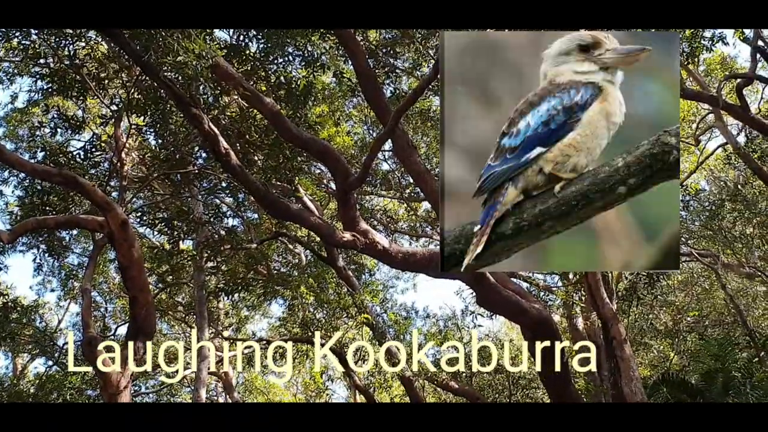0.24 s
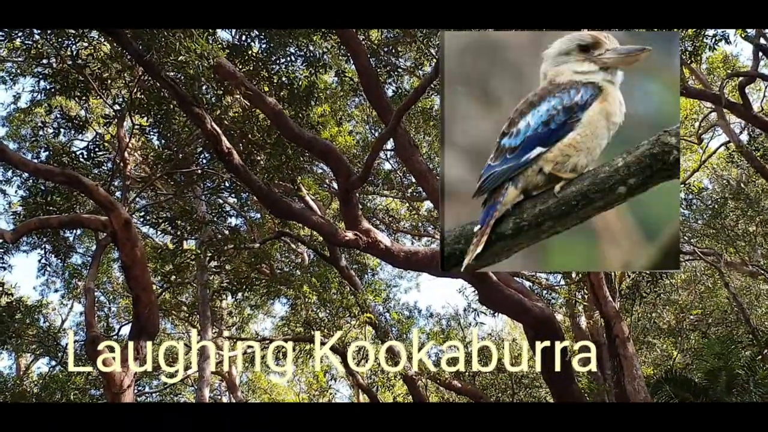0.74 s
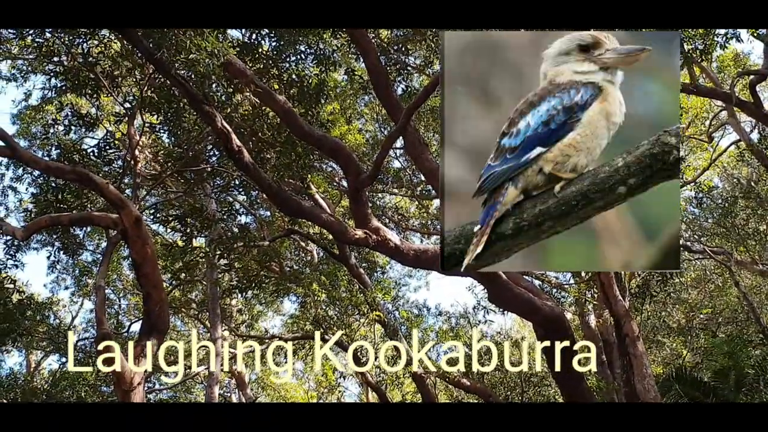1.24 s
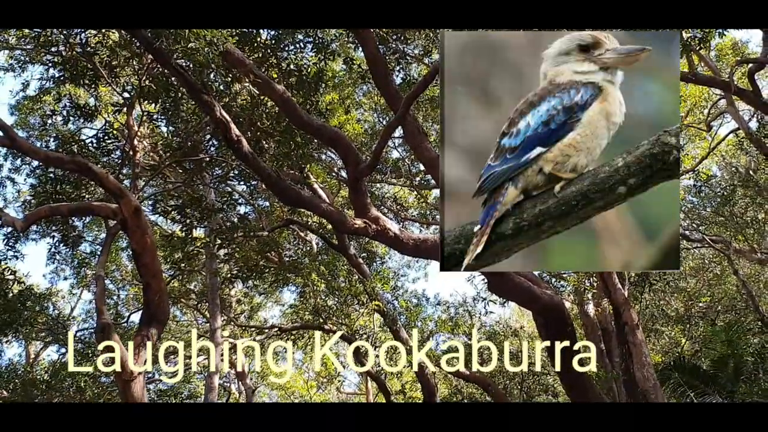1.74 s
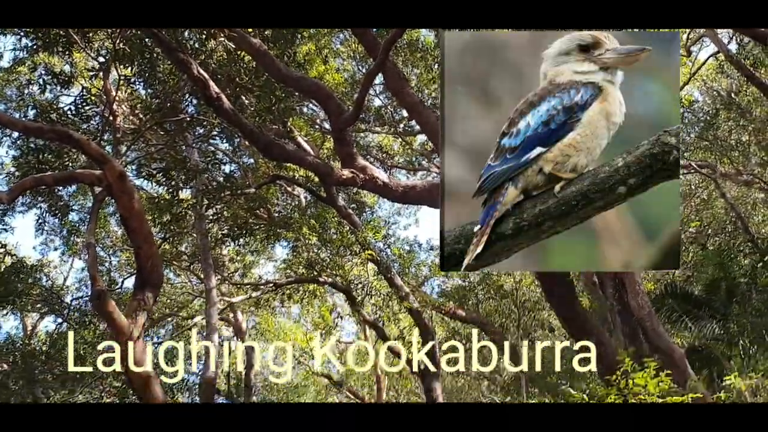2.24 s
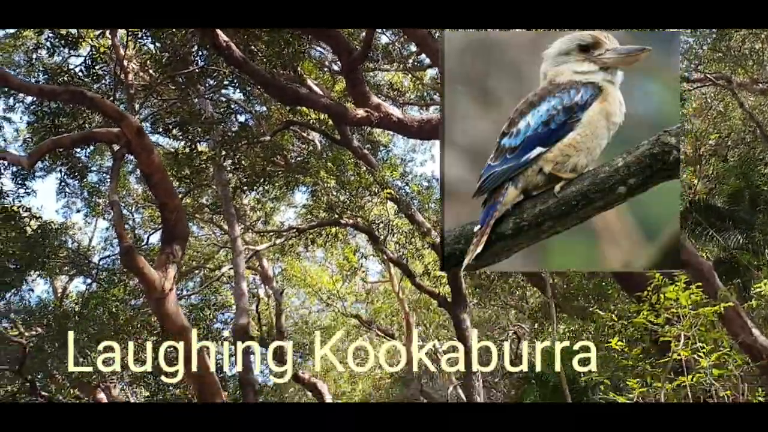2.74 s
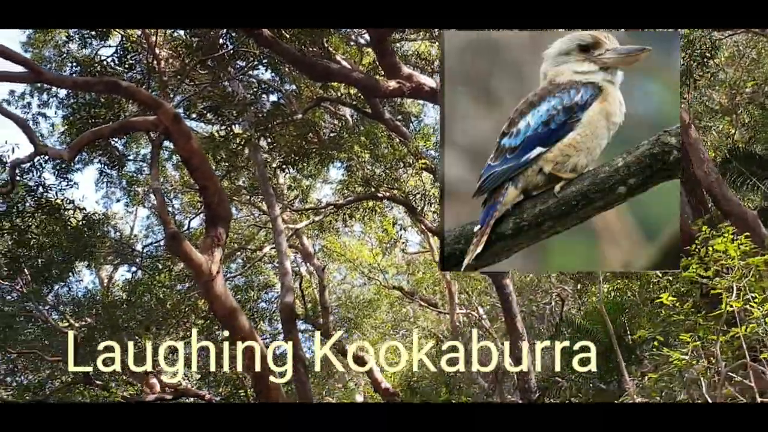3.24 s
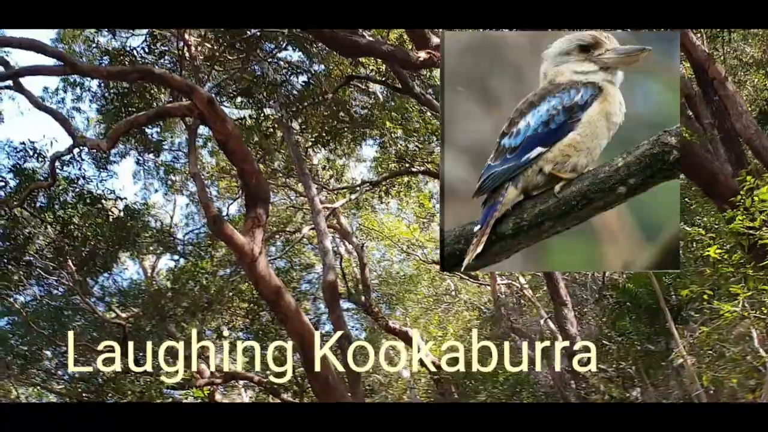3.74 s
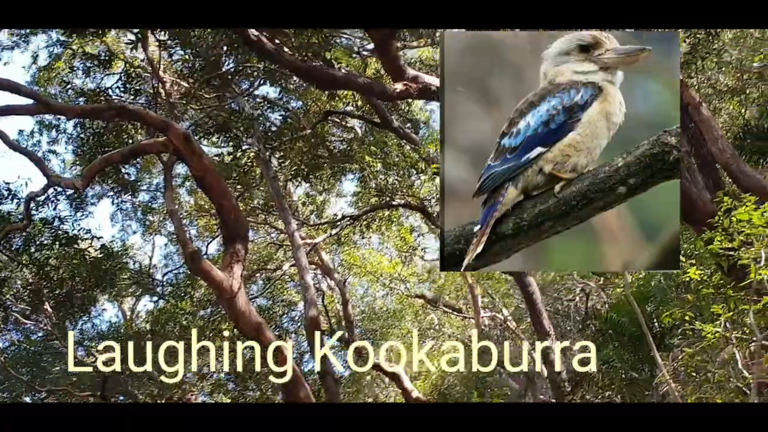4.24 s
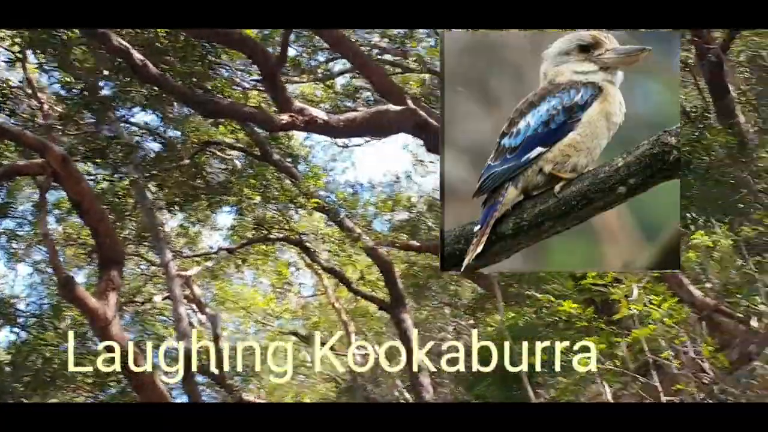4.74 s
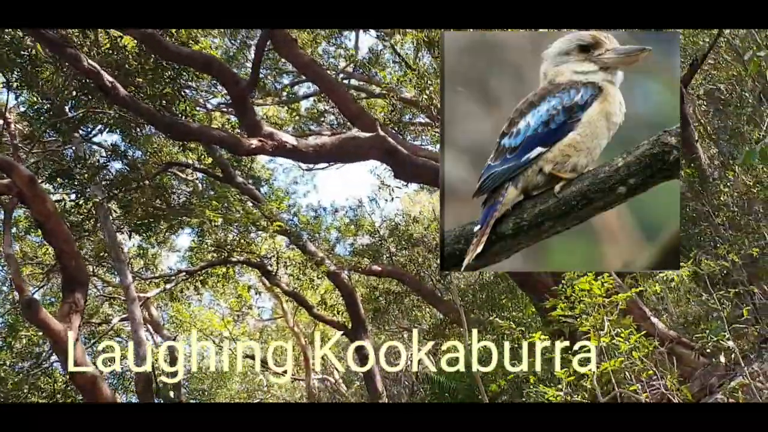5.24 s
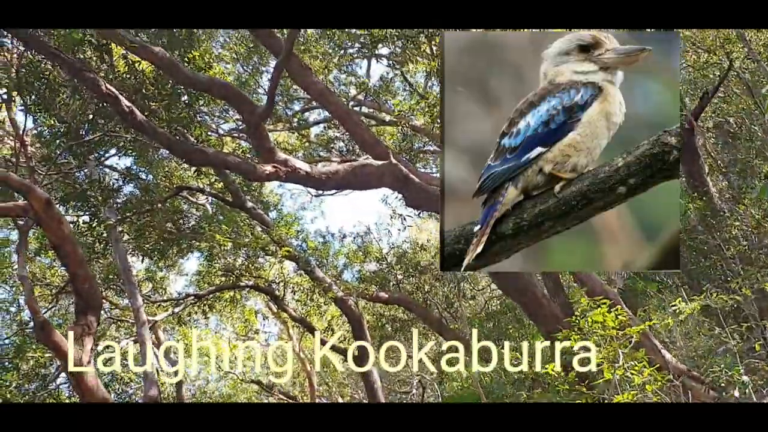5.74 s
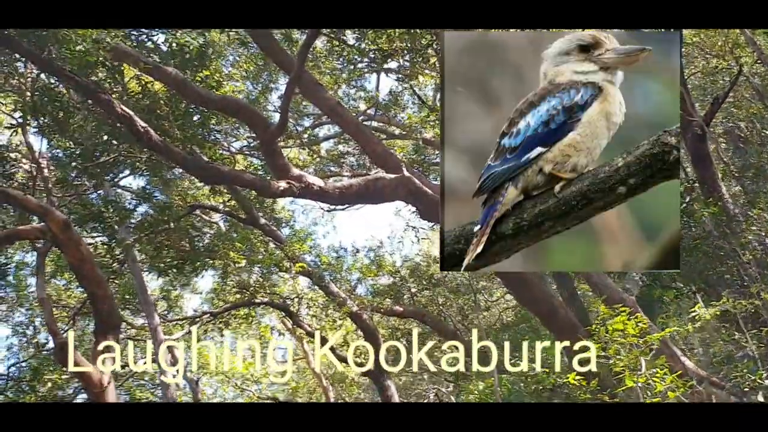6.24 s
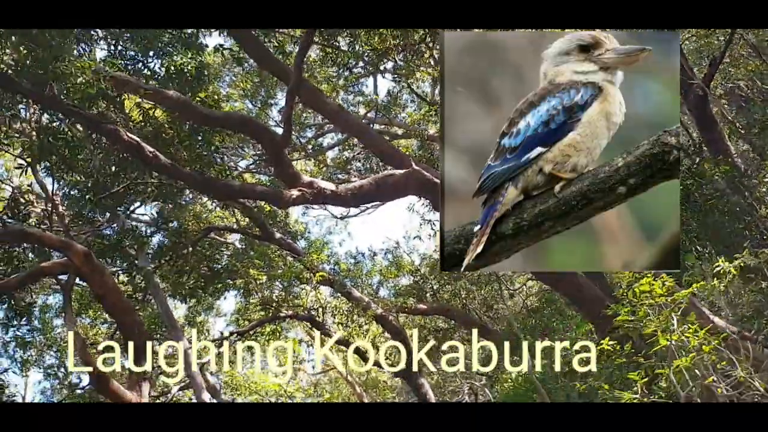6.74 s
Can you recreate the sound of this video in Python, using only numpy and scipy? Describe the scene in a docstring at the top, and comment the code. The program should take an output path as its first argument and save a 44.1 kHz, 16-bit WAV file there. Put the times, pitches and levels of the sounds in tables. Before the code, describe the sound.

A handheld stereo camera picks up two kookaburras in reverberant bush, both to the right. Bright hoots around a whistling mid-high pitch alternate with rough, rolling chuckles; gritty squawks interrupt. Close handling thuds and rubs sit left during the first second or so, ending in a hard click that briefly lowers the level. The hooting thins after four seconds, then two long breaking notes sound before echoes fade.

```python
"""A stand of gum trees, with two kookaburras off to the right of a hand-held camera with two microphone ports.
One bird laughs: pulsed hoots and two long breaking notes from a harmonic voice, joined by a flapping chuckle.
The other throws in harsh rasps, made of snaps and noise ringing a throat. Decaying noise makes the trees echo.
Right at the microphone, fingers bump, rub and grip the case. One sharp tap ducks the gain control,
which recovers slowly. Faint air moves in the leaves behind."""
import sys
import numpy as np
from scipy import signal
from scipy.fft import rfft, irfft, next_fast_len
from scipy.io import wavfile
from scipy.ndimage import map_coordinates

SR = 44100
rng = np.random.default_rng(int(sys.argv[2]) if len(sys.argv) > 2 else 0)


def transcribe(signal):
    """Save signal, clipped to [-1, 1], as a 16-bit WAV file at the path in sys.argv[1]."""
    frames = np.atleast_2d(signal).T
    limited = np.clip(frames, -1, 1)
    pcm = np.round(limited * 32767).astype(np.int16)
    wavfile.write(sys.argv[1], SR, pcm)


N = 308700
TIME = np.arange(N) / SR


def amp(db):
    """Decibels to gain."""
    return 10 ** (np.asarray(db) / 20)


def unit(x):
    """Scale to rms 1."""
    return x / np.sqrt(np.mean(x ** 2) + 1e-20)


def along(points, hz):
    """Read (Hz, value) points on a log frequency axis."""
    f, v = np.transpose(points)
    return np.interp(np.log(hz + 1), np.log(f), v)


def filtered(x, response):
    """x times a response of frequency."""
    n = x.shape[-1]
    padded = next_fast_len(n + 4096)
    hz = np.fft.rfftfreq(padded, 1 / SR)
    return irfft(rfft(x, padded) * response(hz), padded)[..., :n]


def coloured(x, points, stretch=1):
    """x through a spectrum, at rms 1; stretch moves the spectrum up in frequency."""
    return unit(filtered(x, lambda hz: amp(along(points, hz / stretch))))


def wobble(rate, n):
    """A smooth random curve with rate knots a second."""
    knots = rng.standard_normal(n // 8 + 8)
    used = knots[:int(n * rate / SR) + 4]
    return map_coordinates(used, [np.arange(n) * rate / SR], mode="nearest")


def add(track, start_s, x):
    """Mix x into the track at start_s, or at the top if that is negative."""
    i = max(round(start_s * SR), 0)
    track[..., i:i + x.shape[-1]] += x[..., :track.shape[-1] - i]


def swell(t, length, rise, fall):
    """A smooth opening and closing, times in seconds."""
    opening = np.sin(np.pi / 2 * np.clip(t / rise, 0, 1))
    closing = np.sin(np.pi / 2 * np.clip((length - t) / fall, 0, 1))
    return opening * closing


# spectrum of distant air and leaves: freq_hz, level_db (relative)
BUSH = [(25, -3.5), (70, -0.5), (150, -9), (400, -8.5), (800, -8.5), (1600, 3.5), (3000, -17.5),
        (5000, -26.5), (9000, -32.5), (15000, -25.5)]


def bush():
    """Faint moving air in the leaves: coloured noise, partly shared by both ports, slowly wavering."""
    air = rng.standard_normal((2, N)) + 0.94 * rng.standard_normal(N)
    return amp(-45 + 0.37 * wobble(2.607, N)) * coloured(air, BUSH)


# the hand shifts its grip on the case: start_s, length_s, level_db (relative)
SHIFTS = [(0.014, 0.15, -45), (0.237, 0.12, -36), (0.43, 0.1, -57), (0.553, 0.14, -60), (0.823, 0.072, -53),
          (1.024, 0.2, -45), (1.988, 0.032, -42), (2.396, 0.038, -48), (2.525, 0.12, -47),
          (3.506, 0.03, -49), (3.638, 0.19, -54), (4.069, 0.06, -51), (4.256, 0.045, -49),
          (4.374, 0.28, -51.5), (4.744, 0.036, -46), (5.63, 0.09, -51), (5.797, 0.096, -46.5),
          (6.054, 0.11, -47.5), (6.759, 0.25, -52.5)]
SHIFT_DB, SHIFT_FADE_DB_PER_S = 7.5, 51
SHIFT_ATTACK_S, SHIFT_RELEASE_S = .03, 0.055
TREMOR_DB = -70  # the resting hand, about which it wavers


def grip():
    """How hard the case is shaken: a faint tremor, and a short fading swell at each shift of the hand."""
    force = amp(TREMOR_DB + 3 * wobble(7.7, N))
    for start_s, length_s, level_db in SHIFTS:
        span = length_s + SHIFT_ATTACK_S
        t = np.arange(int(span * SR)) / SR
        fading = amp(level_db + SHIFT_DB - SHIFT_FADE_DB_PER_S * t)
        shift = fading * swell(t, span, SHIFT_ATTACK_S, SHIFT_RELEASE_S)
        add(force, start_s - SHIFT_ATTACK_S / 2, shift)
    return force


# fingers bump the camera: start_s, thud_db, click_db (relative)
BUMPS = [(.068, -20, -16.5), (.235, -19, -27), (.245, -33, -13), (0.258, -10.5, -12.5), (0.588, -24, -28),
         (0.641, -29, -25), (1.113, -12.5, 8), (1.132, -12, 1.5)]
# fingers slide on the case: start_s, length_s, hiss_db, rumble_db (relative)
RUBS = [(0.228, .1, -29, -33), (0.549, .16, -35, -43.5)]
# spectrum of handling rumble: freq_hz, level_db (relative)
CASE = [(20, -34.5), (40, -2), (62, 4), (95, -11), (160, -18.5), (300, -29.5), (800, -44.5), (2000, -71.5)]
# spectrum of rubbing hiss: freq_hz, level_db (relative)
SKIN = [(100, 2.5), (500, 3), (3000, 8), (7000, -8.5), (11000, -13.5), (15000, -18.5)]


def handling():
    """Bumps ring as short decaying sines, rubs and grip as coloured noise, all mostly at the left port."""
    thuds, clicks, slides = np.zeros(N), np.zeros(N), np.zeros((2, N))
    t = np.arange(SR // 8) / SR
    for start_s, thud_db, click_db in BUMPS:
        thud = np.sin(2 * np.pi * 68 * t) + 0.43 * np.sin(2 * np.pi * 150 * t)
        add(thuds, start_s, amp(thud_db - 60 * t / 0.035) * thud)
        modes = [(600, 0.13), (2100, 0.81), (4200, 0.97), (10200, 0.25)]  # Hz, gain
        ring = sum(gain * np.sin(2 * np.pi * hz * t) for hz, gain in modes)
        add(clicks, start_s, amp(click_db - 60 * t / 0.0015) * ring)
    for start_s, length_s, hiss_db, rumble_db in RUBS:
        t = np.arange(int(length_s * SR)) / SR
        stroke = swell(t, length_s, 0.017, 0.062) * amp(4.2 * wobble(200, len(t)))
        hiss = coloured(rng.standard_normal((2, len(t))), SKIN)
        add(slides, start_s, amp(hiss_db) * stroke * hiss)
        rumble = coloured(rng.standard_normal(len(t)), CASE)
        add(thuds, start_s, amp(rumble_db) * stroke * rumble)
    # the case rocks between the ports, and each port also feels its own share of the grip
    rocking = np.array([[1.2], [-.4]])
    shake = rocking * rng.standard_normal(N) + 0.58 * rng.standard_normal((2, N))
    held = rocking * thuds + grip() * coloured(shake, CASE)
    return held + clicks * np.array([[1], [.4]]) + slides * np.array([[1], [.8]])


# upper resonances of the laughing throat: freq_hz, level_db (relative)
THROAT = [(600, -60), (1350, -24), (1650, -6), (2150, -12), (2600, 0), (3100, -3), (3650, 0), (4000, -17),
          (4250, -17), (4650, -1), (5050, 2), (5800, -14), (6800, -30), (8000, -22), (8800, -27),
          (9700, -21), (10800, -35), (15000, -46)]


def syrinx(pitch, rough, air, stretch=1):
    """The fundamental, its octave and the edge (overtones plus rush in the throat), each at rms 1."""
    n = len(pitch)
    jitter = .04 * wobble(420, n) + .012 * wobble(1500, n)
    phase = 2 * np.pi * np.cumsum(pitch * (1 + rough * jitter)) / SR
    # a smooth note favours the third harmonic, a rough one the fourth
    third = np.clip(3.8 - 10 * rough, .3, 1.6)
    lower = third * np.sin(3 * phase) + np.sin(4 * phase)
    upper = .04 * np.sin(6 * phase) + .06 * np.sin(7 * phase)
    overtones = unit(lower + upper)
    breath = rng.standard_normal(n) * (1 + 0.36 * np.sin(phase))
    rush = coloured(breath, THROAT, stretch)
    return unit(np.sin(phase)), unit(np.sin(2 * phase)), unit(overtones + air * rush)


# chuckling rolls: start_s, length_s, pitch_hz (at the start), level_db, edge_db (relative)
ROLLS = [(-.1, 0.16, 1118, -31, -6.5), (.407, 0.385, 1249, -23, -15), (1.139, 0.39, 1164, -28, -11.5),
         (1.804, 0.35, 1187, -26, -14.5), (2.173, 0.21, 1255, -30.5, -13.5),
         (2.504, .41, 1197, -26.5, -13.5), (3.13, 0.22, 1189, -26, -15), (3.31, .29, 1192, -24, -15.5),
         (3.945, .325, 1209, -24, -15.5), (4.712, .295, 1169, -24.5, -15.5)]
ROLL_ATTACK_S, ROLL_RELEASE_S = .025, .035
ROLL_SAG_HZ_PER_S = 280  # a roll sinks as the air runs out
FLAP_HZ, FLAP_SAG = 81.75, .31  # typical flap rate; share by which the pitch sags as a flap closes


def chuckle():
    """A loose membrane flaps unevenly; each flap is a tiny chirp that rises to the pitch and sags as it closes."""
    out = np.zeros(N)
    for start_s, length_s, pitch_hz, level_db, edge_db in ROLLS:
        # a roll with a negative start is joined part-way
        t = np.arange(int(max(-start_s, 0) * SR), int(length_s * SR)) / SR
        flaps = np.cumsum(FLAP_HZ * amp(2.6 * wobble(110, len(t)))) / SR
        opening = np.sin(np.pi * flaps) ** 2
        pitch = (pitch_hz - ROLL_SAG_HZ_PER_S * t) * (1.02 - FLAP_SAG * (1 - opening) ** 3)
        tone, octave, rush = syrinx(pitch, rough=.6, air=3)
        size = amp(2.3 * wobble(121.5, len(t)))
        voice = unit(size * (0.54 + opening)) * (tone + amp(-22.5) * octave)
        edge = amp(edge_db + 6.5) * unit(size * (11.0 + opening)) * rush
        effort = swell(t, length_s, ROLL_ATTACK_S, ROLL_RELEASE_S) * amp(level_db - 3.5)
        add(out, start_s, effort * (voice + edge))
    # the flapping gives way while the same throat holds a clean hoot
    held = np.zeros(N)
    for start_s, length_s, *_, rough in HOOTS:
        held += (1 - rough) * swell(TIME - start_s, length_s, .01, .01)
    return np.clip(1 - 0.43 * held, 0, 1) * out


# how long the wood rings: freq_hz, t60_s
TREES = [(300, 1), (1300, 0.89), (2300, 1.0), (5000, 1), (10000, 0.81)]


def trees(x, near_db, far_db):
    """Nearby trunks and limbs scatter the call at once; the wood behind answers with a long tail."""
    hz, t, z = signal.stft(rng.standard_normal((2, SR)), SR, nperseg=256)
    decay = amp(-60 * t / along(TREES, hz)[:, None])
    build_up = 1 - np.exp(-t / 0.015)
    tail = signal.istft(z * decay * build_up, SR, nperseg=256)[1]
    lag = np.arange(tail.shape[1]) / SR
    # cubed noise gives sparse, spiky reflections
    limbs = rng.standard_normal(tail.shape) ** 3 * amp(-60 * lag / 0.19) * (lag > .003)
    response = (amp(near_db) * unit(limbs) + amp(far_db) * unit(tail)) / np.sqrt(len(lag))
    return signal.fftconvolve(x[None], response, axes=1)[:, :N]


def perched(x, right_db, lag, near_db, far_db):
    """A bird to the right: louder at the right port, the left lagging by lag samples; its echoes more even."""
    def ports(hz):
        left = amp(-right_db / 2) * np.exp(-2j * np.pi * hz * lag / SR)
        right = amp(right_db / 2) + 0 * hz
        return np.array([left, right])

    return filtered(x, ports) + trees(x, near_db, far_db) * amp([[-2.8], [2.8]])


# rasps of the second bird: start_s, length_s, centre_hz, fall (share of pitch over the call),
# level_db, edge_db (relative)
RASPS = [(0.118, 0.093, 1946, 0.058, -22.5, -6), (0.219, 0.085, 2175, .13, -24, -12.5),
         (0.395, 0.073, 1740, 0.22, -34, 5), (2.361, .072, 2100, 0, -32, -10.5),
         (2.436, 0.059, 1830, .07, -34, -4), (2.673, 0.064, 2020, 0, -35, -11),
         (3.032, 0.05, 2020, -0.018, -34.5, -14), (3.659, 0.072, 1904, 0.02, -22.5, -5.5),
         (3.765, 0.046, 2107, -.14, -29.5, -16), (4.054, 0.082, 1728, -0.011, -28, -4.5),
         (4.37, 0.076, 1865, 0, -25, -6), (4.496, 0.075, 1744, 0, -37, -22),
         (4.647, 0.062, 1739, 0, -27.5, -9), (4.964, .1, 2077, -.15, -29.5, -9),
         (5.02, 0.078, 1790, -0.014, -27, -6), (5.275, .11, 1893, -0.29, -27, -5.5),
         (5.931, 0.054, 1729, 0, -32.5, -12), (6.392, 0.066, 1804, 0, -34, -10),
         (6.611, 0.057, 1930, -0.015, -40.5, -11.5), (6.822, 0.048, 1764, 0, -45, -19)]
# main resonances of the rasping throat, for a 1900 Hz centre: freq_hz, level_db (relative)
RASP_BODY = [(200, -70), (600, -21), (850, -12), (1400, -9), (1650, -1), (2000, 0), (2300, -5), (2900, -11),
             (3200, -30), (4500, -90)]
# its upper resonances, for the same centre: freq_hz, level_db (relative)
RASP_EDGE = [(1500, -60), (3200, -8.5), (3800, 1.5), (4250, 12), (4700, -5), (5500, 4), (7000, -13.5),
             (9500, -23.5), (12000, -38), (15000, -81)]


def rasps():
    """An unsteady squawk with an arching pitch; a snap every third cycle and noise ring the tight throat."""
    out = np.zeros(N)
    for start_s, length_s, centre_hz, fall, level_db, edge_db in RASPS:
        t = np.arange(int((length_s + .02) * SR)) / SR
        n, u = len(t), t / t[-1]
        arch = 1.05 - .14 * (2 * u - 1) ** 2 - fall * (u - .5)
        cycles = np.cumsum(centre_hz * arch * (1 + .06 * wobble(700, n))) / SR
        snaps = unit(np.diff(np.floor(cycles / 3), prepend=0))
        source = snaps + 1.2 * rng.standard_normal(n)
        stretch = centre_hz / 1900
        body = unit(coloured(source, RASP_BODY, stretch) + 1.2 * np.sin(2 * np.pi * cycles))
        edge = coloured(source, RASP_EDGE, stretch) + 1.15 * np.sin(4 * np.pi * cycles)
        # soft calls lose their top resonance
        top_db = min(2.6 * (level_db + 30), 0)
        edge = unit(filtered(edge, lambda hz: amp(along([(4400, 0.018), (5100, top_db)], hz))))
        grit = unit(amp(2.5 * wobble(328.0, n)))
        effort = amp(level_db - 1.0) * swell(t, t[-1], 0.03, 0.022) * grit
        add(out, start_s - .008, effort * (body + amp(edge_db) * edge))
    return out


# hooted notes: start_s, length_s, pitch_hz (nominal), level_db (relative), press (0 open, 1 pressed),
# roughness (about 0 to 1)
HOOTS = [(0.193, 0.072, 1432, -20.5, 0.8, 1.11), (0.586, 0.087, 1306, -23, 0.16, 0.73),
         (.712, 0.06, 1301, -19, 0.89, 0.33), (0.964, 0.054, 1361, -26.5, 0, 0.48),
         (1.013, 0.11, 1292, -17.5, 0.79, 0.48), (1.391, 0.098, 1349, -17, 0.44, 0.68),
         (1.741, 0.073, 1275, -18.5, 0.81, 0.35), (1.847, .08, 1318, -20, 0.34, 0.65),
         (2.11, 0.072, 1281, -17.5, 0.81, 0.39), (2.239, 0.099, 1313, -23.5, 0.12, 0.25),
         (2.442, .069, 1297, -18.5, 0.93, 0.35), (2.652, 0.076, 1260, -21.5, .4, .6),
         (2.809, .067, 1267, -17.5, 0.88, .25), (3.056, .08, 1307, -21.5, 0.23, 0.32),
         (3.171, 0.071, 1258, -18, .9, 0.26), (3.469, 0.09, 1281, -21, 0.06, 0.51),
         (3.874, 0.091, 1302, -22, .1, 0.39), (5.323, 0.066, 1284, -23.5, 1, 1.03),
         (6.768, 0.063, 1372, -42, 0.4, 0.14)]
PUSH_HZ = 46.54  # pushes of air a second, rounded to a whole number in each note
# pressing a note weakens its octave, sharpens its edge and lets its pitch fall by a share
OPEN_OCTAVE_DB, PRESSED_OCTAVE_DB = -8, -16
OPEN_EDGE_DB, PRESSED_EDGE_DB = -25.5, -15.5
PRESSED_FALL = 0.028


def hoots():
    """Each hoot is a few quick pushes of air; the pitch arches over the note and lifts with every push."""
    out = np.zeros(N)
    for start_s, length_s, pitch_hz, level_db, press, rough in HOOTS:
        t = np.arange(int(length_s * SR)) / SR
        u = t / length_s
        push = np.sin(np.pi * u * np.round(length_s * PUSH_HZ)) ** 2
        octave_db = OPEN_OCTAVE_DB + press * (PRESSED_OCTAVE_DB - OPEN_OCTAVE_DB)
        edge_db = OPEN_EDGE_DB + press * (PRESSED_EDGE_DB - OPEN_EDGE_DB)
        arch = 1.016 - .075 * (2 * u - 1) ** 4
        pitch = pitch_hz * (arch + .035 * (push - .7) - press * PRESSED_FALL * (u - .5))
        tone, octave, edge = syrinx(pitch, rough + .12, air=.25 + 1.8 * rough, stretch=1.03)
        gate = swell(t, length_s, 0.0069, 0.0033) * amp(5.7 * rough * wobble(251.0, len(t)))
        voice = unit(gate * (.2 + rough + push)) * (tone + amp(octave_db - 3.5) * octave)
        sharp = amp(edge_db + 3.0) * unit(gate * (7.3 + push)) * edge
        add(out, start_s, amp(level_db - 2.5) * (voice + sharp))
    return out


# two long late "kook" notes: start_s, pitch_hz (nominal), level_db (relative)
KOOKS = [(5.665, 1307, -17), (6.083, 1300, -17.5)]
KOOK_CLEAR_S, KOOK_BREAK_S = .08, .06  # a clear part, then the voice breaks into a falling rattle
KOOK_GROW_DB, KOOK_BREAK_DB = 10, -8.5
KOOK_DROOP, KOOK_FLAP_HZ = 0.25, 90.2  # share of pitch lost in the break; typical flap rate
KOOK_OCTAVE_DB, KOOK_OVERTONES_DB, KOOK_RUSH_DB = -22.5, -26.5, -12.5


def kooks():
    """A clear note grows in two pushes, then breaks into flaps that droop and die away."""
    out = np.zeros(N)
    t = np.arange(int((KOOK_CLEAR_S + KOOK_BREAK_S) * SR)) / SR
    u = np.clip(t / KOOK_CLEAR_S, 0, 1)
    droop = np.clip((t - KOOK_CLEAR_S) / KOOK_BREAK_S, 0, 1)
    push = np.abs(np.sin(2 * np.pi * u))
    growth = amp(KOOK_GROW_DB * (u - 1))
    clear = swell(t, KOOK_CLEAR_S + .002, .004, .008) * growth * (.3 + push)
    rattle = amp(KOOK_BREAK_DB) * swell(t - KOOK_CLEAR_S, KOOK_BREAK_S, .004, 0.058)
    arch = 1.03 - .11 * (2 * u - 1) ** 4 + .04 * (push - .7)
    for start_s, pitch_hz, level_db in KOOKS:
        flaps = np.cumsum(KOOK_FLAP_HZ * amp(2.54 * wobble(110.5, len(t)))) / SR
        flap = np.sin(np.pi * flaps) ** 2
        pitch = pitch_hz * (arch - KOOK_DROOP * droop + .25 * (droop > 0) * (flap - .5))
        tone, octave, overtones = syrinx(pitch, rough=.34, air=.6, stretch=1.03)
        rush = coloured(rng.standard_normal(len(t)), THROAT, stretch=1.057)
        blend = tone + amp(KOOK_OCTAVE_DB) * octave + amp(KOOK_OVERTONES_DB) * overtones
        voice = (clear + rattle * (0.07 + flap)) * blend
        add(out, start_s, amp(level_db) * (voice + amp(KOOK_RUSH_DB) * rattle * rush))
    return out


def scene():
    """Both birds in the trees, the hand on the camera and the bush behind."""
    laugh = amp(2.0) * (hoots() + kooks() + chuckle())
    laugher = perched(laugh, right_db=6.5, lag=-1.9, near_db=-1, far_db=-4.5)
    rasper = perched(rasps(), right_db=9.0, lag=2.14, near_db=1.5, far_db=-5.5)
    return laugher + rasper + handling() + bush()


TOP_HZ = 15500  # nothing passes above this


def record(dry):
    """Gain control ducks at once on an overload and creeps back; the camera sheds deep bass and top treble."""
    over_db = np.maximum(20 * np.log10(np.abs(dry).max(axis=0) / .9 + 1e-9), 0)
    release = np.exp(-TIME / 2.0)
    # the latest deepest duck, shrinking with a 2 s time constant
    duck_db = np.maximum.accumulate(over_db / release) * release
    return filtered(dry * amp(-duck_db), lambda hz: (hz < TOP_HZ) * (1j * hz / (1j * hz + 28)) ** 2)


dry = scene()
out = record(dry)
transcribe(out)
```